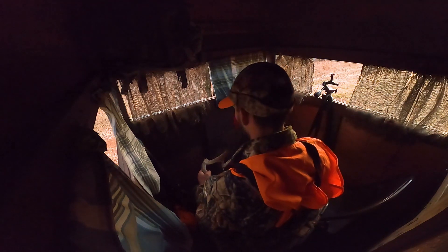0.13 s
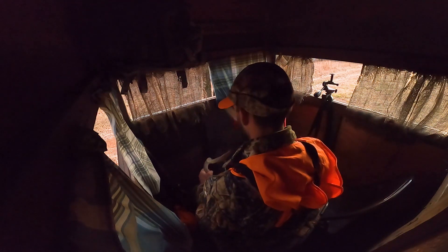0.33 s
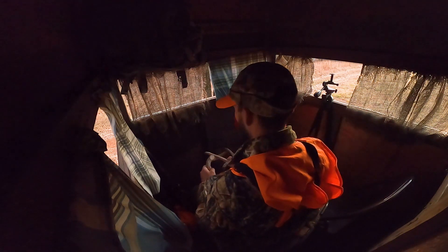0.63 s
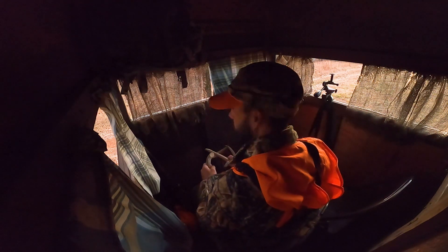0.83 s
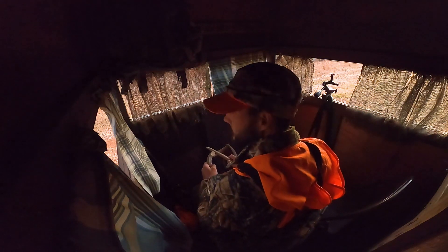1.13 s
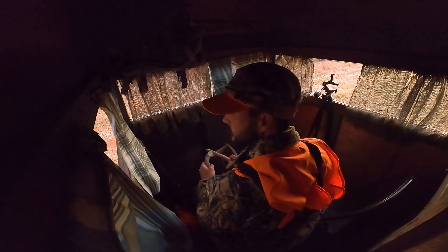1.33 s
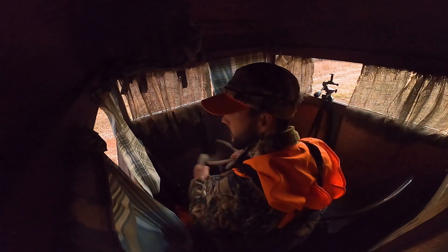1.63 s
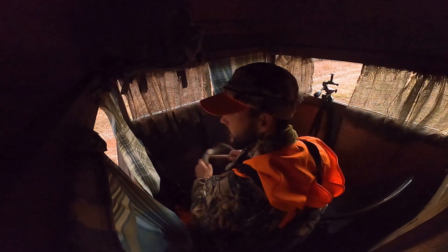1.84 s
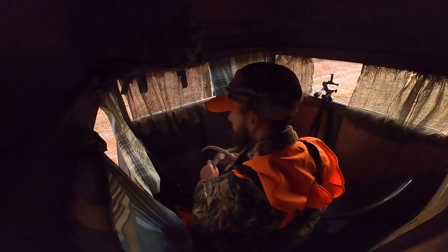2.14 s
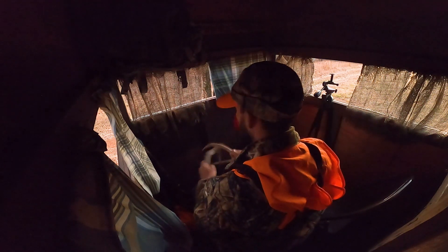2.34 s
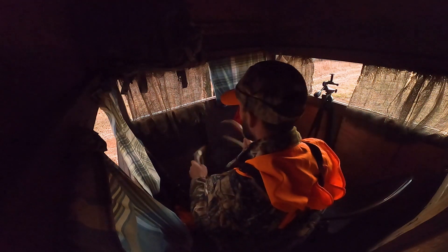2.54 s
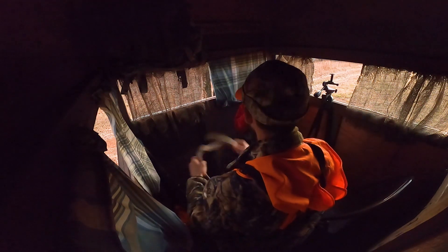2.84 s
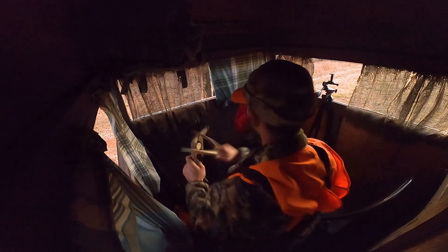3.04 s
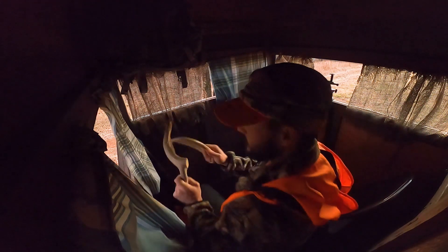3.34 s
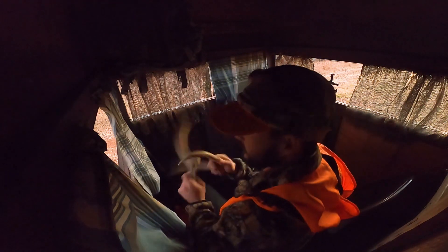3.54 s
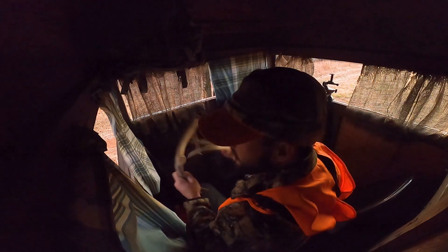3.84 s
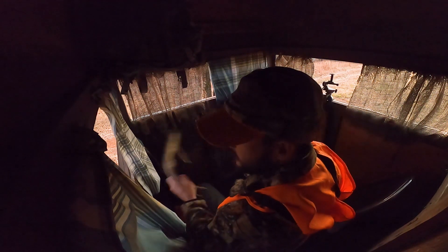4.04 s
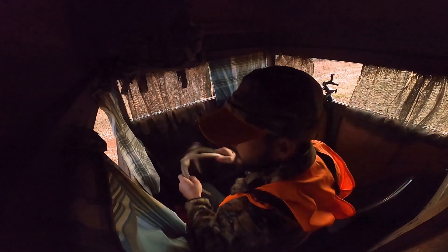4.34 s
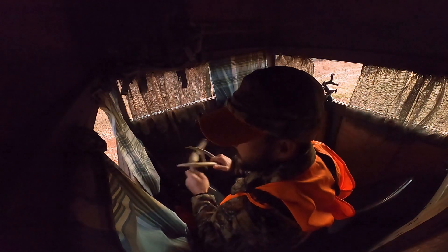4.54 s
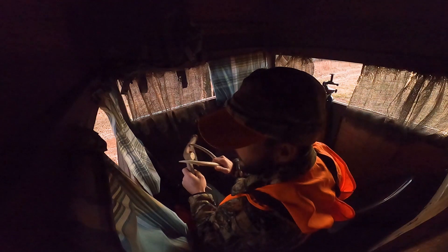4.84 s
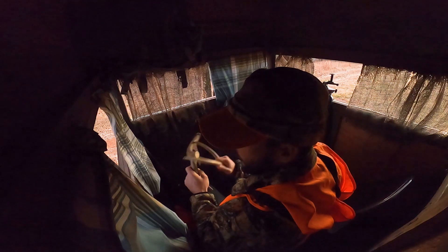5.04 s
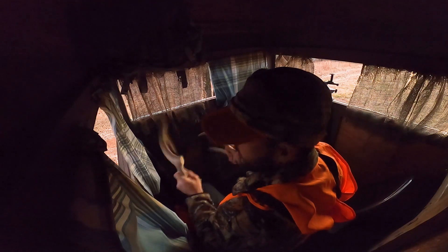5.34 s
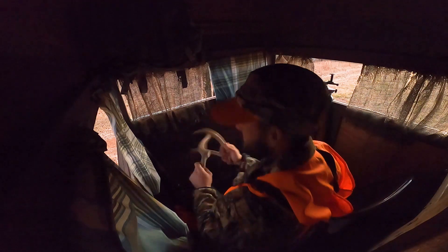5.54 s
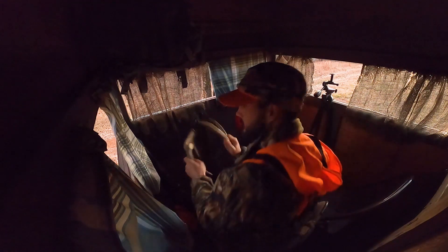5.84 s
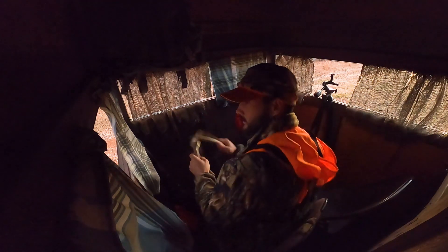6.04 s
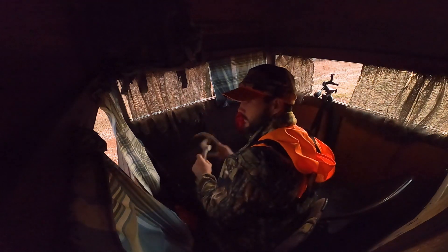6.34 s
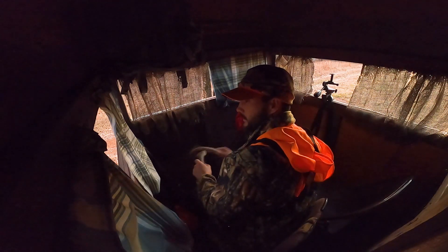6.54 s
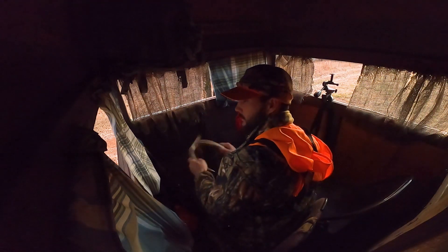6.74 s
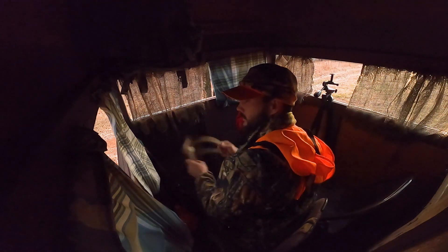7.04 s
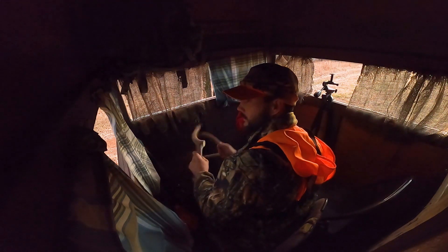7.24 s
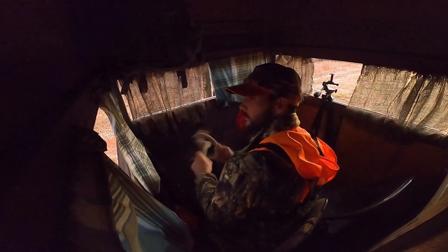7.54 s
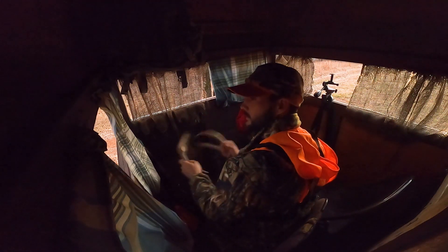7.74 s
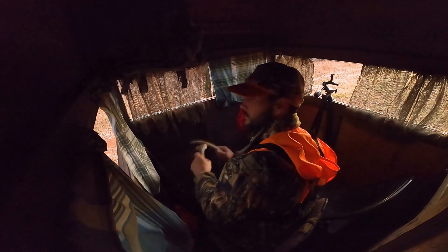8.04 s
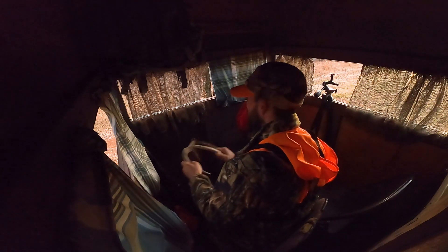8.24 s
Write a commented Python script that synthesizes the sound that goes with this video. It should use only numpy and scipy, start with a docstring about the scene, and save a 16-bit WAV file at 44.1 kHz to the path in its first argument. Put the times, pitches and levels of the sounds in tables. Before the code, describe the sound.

Two deer antlers clack and scrape together in irregular bursts, close by, over a low outdoor rumble.

```python
"""A low outdoor rumble and a wavering hum come first and fill every pause. Then two deer
antlers are knocked and ground together by hand inside a small cloth hunting blind.
Their tips (tines) clack and chatter, their rough shafts (beams) scrape, and both set the
same short bone notes ringing. Two dull bumps come near the end.
Two close microphone openings listen from behind."""
import sys
import numpy as np
from scipy import signal
from scipy.fft import rfft, irfft
from scipy.io import wavfile
from scipy.ndimage import uniform_filter1d, map_coordinates

SR = 44100
rng = np.random.default_rng(int(sys.argv[2]) if len(sys.argv) > 2 else 0)


def transcribe(u):
    """Save the signal u as a 16-bit wav file named by the first command-line argument.

    u: samples, shape (n,) or (channels, n), limited to [-1, 1]; the rate is SR.
    q: integer samples, one column per channel.
    """
    v = np.clip(np.atleast_2d(u).T, -1, 1)
    q = np.round(v * 32767).astype(np.int16)
    wavfile.write(sys.argv[1], SR, q)


N = 370440

# The tone of the outdoor rumble: pitch_hz, relative_db
RUMBLE_TONE = [(18, -14), (35, -2), (75, -6), (120, -16), (160, -14.5), (290, -23.5), (480, -33.5),
               (640, -47), (1400, -52), (2800, -56.5), (5600, -59), (10000, -77)]
# How alike the rumble is on the left and right (1 is the same): pitch_hz, likeness
RUMBLE_LIKENESS = [(60, 0.92), (380, 0.82), (2380, 0.94), (15000, 0.08)]
# The wavering low hum: pitch_hz, width_hz, level_db
LOW_HUM = (53, 9.1, -41)
# Knocks of tine on tine: start_s, level_db, ring_hz, treble_db
TINE_KNOCKS = [(0.569, -12.5, 5680, -7.5), (0.638, -35.5, 1240, -11.5), (0.6486, -27, 3110, -19),
               (1.7735, -27, 4390, 0.5), (1.8363, -14.5, 2700, -13.5), (1.9122, -14.5, 2975, -9.5),
               (1.9204, -27, 3120, -10), (1.9995, -29.5, 4080, -7), (2.1803, -21, 2840, -1),
               (2.2274, -14, 2170, -11), (2.413, -32.5, 3550, -6), (2.454, -26, 3850, -5.5),
               (2.5739, -27.5, 2080, -13), (2.589, -29, 4930, -1.5), (2.7957, -14, 3060, -3.5),
               (2.958, -24.5, 1572, -11.5), (3.1583, -19, 3100, -0.5), (3.1681, -15, 2810, -5),
               (3.3892, -22.5, 3140, -6.5), (3.409, -29.5, 3180, 6), (3.7152, -18.5, 2810, 0.5),
               (3.7801, -18, 2870, -11), (3.959, -36.5, 3350, -6.5), (3.9825, -32.5, 2850, -4),
               (4.2288, -17.5, 5550, 1), (4.368, -25, 2310, -28.5), (4.3828, -26, 1485, -13),
               (4.5142, -31, 4760, -4), (5.3434, -29, 2780, -1.5), (5.346, -26.5, 1590, 2),
               (5.5742, -30.5, 3560, 1.5), (5.6178, -19.5, 2680, -2.5), (5.685, -20.5, 1510, 1.5),
               (5.7018, -19.5, 4730, -10.5), (5.7152, -26.5, 2700, -6.5), (5.7235, -37.5, 2530, 0),
               (5.7676, -32.5, 3580, -4.5), (5.7895, -20, 4950, -1.5), (5.8816, -32, 2710, -5),
               (5.896, -42.5, 5200, 9), (6.0792, -15.5, 3114, -0.6), (6.1816, -26.5, 3360, -19.5),
               (6.1921, -26, 2730, -5), (6.34, -29, 3410, 4.5), (6.3601, -29, 5680, 4.5),
               (6.372, -18.5, 3310, -11), (6.46, -15, 2730, -18), (6.675, -26, 2570, -5),
               (6.6847, -17, 2630, -19), (6.7035, -16, 3570, -9.5), (6.7258, -18, 2110, -8.5),
               (6.8631, -16.5, 2730, -4.5), (6.8742, -32, 2500, 7), (6.9325, -18.5, 2880, -2.5),
               (6.9428, -15.5, 2700, -5), (7.1488, -40, 2594, -3.5), (7.216, -29.5, 2377, 1),
               (7.2742, -17, 2876, -2), (7.326, -18.5, 2530, -3), (7.3364, -20, 2476, -15),
               (7.664, -22.5, 5600, 1), (7.6791, -19, 3340, -9.5), (7.751, -31, 2145, -8.5),
               (7.834, -17, 2608, -13.5), (7.856, -27, 5960, 1.5), (8.086, -18, 2790, 2),
               (8.116, -17, 3620, -8), (8.274, -17, 3950, -11)]
# The notes an antler rings at: pitch_hz, relative_db
BONE_NOTES = [(530, -13), (738, -17.5), (1238, -10), (1480, -5.5), (1728, -12), (1870, -9), (2060, -8),
              (2299, -7), (2460, -6), (2751, -3.5), (3050, -13), (3289, -8), (3500, -3.5), (4050, -7),
              (4550, -12.5), (4980, -15.5)]
# The tone of countless small contacts: pitch_hz, relative_db
CHATTER_TONE = [(120, -57), (200, -30), (310, -23), (420, -16), (745, -15), (1000, -9), (1490, 1),
                (2730, 2.5), (4310, -1.5), (5170, -8), (9280, -27), (15800, -71)]
# Strokes of beam along beam: hardest_press_s, rise_s, fall_s, level_db, treble_db, ring_hz
SCRAPE_STROKES = [(0.63, 0.042, 0.057, -29, -10.5, 2500), (0.788, 0.11, 0.09, -49, 1, 2675),
                  (1.591, 0.14, 0.083, -43.5, 5, 2650), (1.65, .08, 0.056, -50, 12.5, 2200),
                  (1.72, 0.014, 0.034, -59.5, 20, 4400), (1.968, 0.074, 0.07, -22.5, 4.5, 2130),
                  (2.34, 0.12, 0.09, -26.5, -6.5, 2200), (2.418, 0.023, 0.16, -33, 1.5, 3280),
                  (2.598, 0.092, 0.016, -24.5, 4.5, 4560), (2.978, 0.19, 0.048, -27.5, -3.5, 1530),
                  (3.292, 0.14, 0.044, -39, 3.5, 1700), (3.345, .028, 0.046, -32, 9, 2580),
                  (3.412, 0.016, 0.068, -23, -11.5, 3070), (3.875, .09, 0.061, -43, 2, 1520),
                  (3.992, 0.045, 0.056, -26, 5, 2770), (4.27, 0.049, 0.037, -25, -1.5, 2100),
                  (4.329, 0.096, 0.23, -38.5, -10, 1370), (4.41, 0.033, 0.06, -27, -5.5, 1510),
                  (4.479, 0.1, 0.071, -23.5, 0.5, 2750), (4.572, 0.094, 0.067, -35.5, 3, 2750),
                  (4.714, 0.088, 0.053, -37, 4.5, 1760), (4.841, 0.097, 0.036, -47, 9, 2060),
                  (4.945, 0.089, 0.07, -49, 7.5, 2990), (5.199, 0.06, 0.039, -49.5, 9.5, 2010),
                  (5.344, 0.029, 0.031, -30, 12.5, 3000), (5.478, 0.019, 0.045, -54, 6, 1175),
                  (5.733, 0.015, .05, -36, -16.5, 2510), (5.779, 0.058, 0.024, -30, 4.5, 3460),
                  (5.899, 0.041, 0.034, -27, 5, 2710), (6.208, 0.063, 0.037, -22, 10, 2820),
                  (6.713, 0.039, 0.1, -21.5, 0.5, 2440), (6.791, 0.023, 0.065, -37, -18, 2760),
                  (7.068, 0.1, 0.16, -31, -10.5, 1230), (7.148, 0.13, 0.023, -29.5, 6, 2700),
                  (7.424, 0.035, 0.028, -31, 10.5, 2650), (7.691, 0.015, 0.061, -22, -16, 3510),
                  (8.117, 0.035, 0.04, -19.5, 9.5, 3300), (8.209, 0.036, 0.065, -42, -6, 1802),
                  (8.299, 0.012, 0.082, -36, -2, 4046), (8.39, 0.17, 0.053, -38, 1.5, 2680)]
# How much louder the left microphone opening is: pitch_hz, left_minus_right_db
LEFT_LOUDER = [(60, -0.5), (130, -2), (290, -1), (640, 4), (1410, 0), (3100, 4.5), (6820, 0), (15000, -0.5)]
# How far the wave at the left opening runs ahead: pitch_hz, lead_radians
LEFT_AHEAD = [(200, 0.03), (690, -1.34), (1380, 0.97), (2200, -0.07), (3700, -1.5), (5200, -.3),
              (7000, -1.2), (13000, -1.5)]
# Blows that bend the whole beam: start_s, level_db
BEAM_BLOWS = [(2.803, -37), (3.168, -37), (3.358, -30.5), (3.393, -32.5), (4.232, -34), (4.378, -36),
              (5.35, -25), (5.626, -39.5), (5.914, -32.5), (6.082, -38.5), (6.224, -37), (6.461, -34),
              (6.75, -26), (6.875, -32), (6.943, -31.5), (7.848, -33), (8.086, -22), (8.113, -23.5)]
# Dull bumps: start_s, level_db, pitch_hz, fade_s
DULL_BUMPS = [(7.702, -21, 55.4, 0.41), (8.089, -4, 77.8, 0.0099)]

BONE_FADE_S = .085  # hands damp every note alike; a fade time is how long a 60 dB drop takes
SNAP_DB, SNAP_PER_TREBLE, SOFTEST_DB = 1.5, 0.66, -23  # harder contacts snap louder
STROKE_DEPTH_DB, STROKE_CURVE = 30, 1.276  # drop over a rise or fall time; roundness of the swell
TICKS_PER_S = 450  # how often ridges catch in a scrape
FOCUS_DB = 8  # boost for bone notes near the tine's own note
GLIDE, DETUNE = .035, .03  # share by which rubbed notes slide and shift with the grip
SWAY_SAMPLES, SWAY_DB = .6, .7  # moving hands shift arrival time and left-right balance
BEAM_HZ, BEAM_FADE_S, BEAM_RISE_S = 316.6, 0.22, .01
SPLIT_HZ, TOP_HZ = 5000, 15900  # where the treble begins and ends


def gain_of(db):
    """Turns decibels into a number to multiply by."""
    return 10 ** (np.asarray(db) / 20)


def evened(x):
    """Scales a signal to an average strength (rms) of 1."""
    return x / np.sqrt(np.mean(x ** 2) + 1e-20)


def look_up(table, hz):
    """Reads a table between its rows, on a musical pitch scale."""
    pitches, values = np.transpose(table)
    return np.interp(np.log(hz + 1), np.log(pitches + 1), values)


def add(mix, start_s, sound):
    """Mixes a sound in at a given time."""
    part = mix[round(start_s * SR):][:len(sound)]
    part += sound[:len(part)]


def outdoor_rumble():
    """Deep noise in which patches of pitch slowly swell and sink."""
    frames, hz = N // 512 + 5, np.fft.rfftfreq(2048, 1 / SR)
    a, b, c, d, patches = rng.standard_normal((frames, 1025, 5)).T
    patches = evened(uniform_filter1d(uniform_filter1d(patches, 6, 0), 20, 1))
    likeness = look_up(RUMBLE_LIKENESS, hz)[:, None]
    left = a + 1j * b
    right = likeness * left + np.sqrt(1 - likeness ** 2) * (c + 1j * d)
    spectra = np.array([left, right]) * gain_of(look_up(RUMBLE_TONE, hz)[:, None] + 1.5 * patches)
    return gain_of(-43) * evened(signal.istft(spectra, nperseg=2048, noverlap=1536)[1][:, :N])


def low_hum():
    """Noise in one narrow low band, heard as a wavering note."""
    hz, width_hz, db = LOW_HUM
    smooth = signal.butter(2, width_hz / 2, fs=SR, output="sos")
    a, b = signal.sosfilt(smooth, rng.standard_normal((2, N)))
    waver = (a + 1j * b) / ((a ** 2 + b ** 2) ** 0.089 + 1e-12)  # dividing softens the swells
    return gain_of(db) * evened((waver * np.exp(2j * np.pi * hz * np.arange(N) / SR)).real)


def tilt_db(hz, treble_db):
    """Hard tip contacts favour high notes, broad soft ones favour low notes."""
    return 0.18 * (treble_db - 4.0) * np.log2(np.clip(hz, 900, 14000) / 2500)


def focus_db(hz, ring_hz, octaves):
    """Bone notes near the touched tine's own note speak louder."""
    return FOCUS_DB * np.exp(-(np.log2(hz / ring_hz) / octaves) ** 2)


def chatter_bands(noise, treble_db, lumps_db):
    """Shapes noise into bone chatter; returns its body and its treble, equally strong."""
    hz = np.fft.rfftfreq(len(noise), 1 / SR)
    lump_places = np.linspace(np.log(300), np.log(16000), 30)
    lumps = np.interp(np.log(hz + 1), lump_places, rng.standard_normal(30))
    lumps *= lumps_db * np.clip(hz / 1500, .3, 1)
    spectrum = rfft(noise) * gain_of(look_up(CHATTER_TONE, hz) + lumps + tilt_db(hz, treble_db))
    high = 1 / (1 + (SPLIT_HZ / (hz + 1)) ** 8)
    return [evened(irfft(spectrum * band, len(noise))) for band in (1 - high, high)]


def struck_bone(t, ring_hz, treble_db):
    """A knock starts all the bone notes; each grip and spot weighs and tunes them anew."""
    hz, db = np.transpose(BONE_NOTES)[:, :, None]
    louder, sharper, phase = np.clip(rng.standard_normal((3, len(hz), 1)), -1.5, 1.5)
    strengths = gain_of(db + 4.9 * louder + focus_db(hz, ring_hz, octaves=0.4) + tilt_db(hz, treble_db))
    swell = 1 - np.exp(-t * hz / 2.0)  # low notes take longer to build
    notes = np.sin(2 * np.pi * hz * (1 + 0.022 * sharper) * t + 2 * phase)
    return (strengths * swell * notes).sum(0) / np.sqrt((strengths ** 2).sum())


def contact_snap(t, ring_hz, treble_db):
    """The first touch of two tines: a crack about a millisecond long."""
    hz = [ring_hz, *[4400, 7400] * rng.uniform(.75, 1.25, 2)]
    tones = gain_of(3.58 * tilt_db(hz, treble_db - 2.5)) @ np.sin(2 * np.pi * np.outer(hz, t))
    age = t / .0005
    pulse = 2 * age * np.exp(1 - age)
    return gain_of(SNAP_DB + SNAP_PER_TREBLE * max(treble_db, SOFTEST_DB)) * pulse * tones


def tine_clacks():
    """Each knock gives a snap, a dying chatter, the bone notes and the struck tine's own note."""
    out, t = np.zeros(N), np.arange(SR // 5) / SR
    for start_s, level_db, ring_hz, treble_db in TINE_KNOCKS:
        body, treble = chatter_bands(rng.standard_normal(len(t)), treble_db, lumps_db=2.0)
        bone = struck_bone(t, ring_hz, treble_db)
        snap = contact_snap(t, ring_hz, treble_db)
        rebounds = signal.fftconvolve(rng.standard_normal(len(t)), np.hanning(90), "same")
        rattle = gain_of(3.94 * evened(rebounds))  # tines bounce back unevenly
        body *= np.minimum(t / 0.013, 1) * gain_of(-60 * t / 0.1)
        treble *= 0.63 * gain_of(-60 * t / 0.08) + 0.97 * gain_of(-60 * t / 0.024)
        chatter = rattle * (body + gain_of(treble_db) * treble)
        tine = np.sqrt(rattle) * np.sin(2 * np.pi * ring_hz * t)
        tine *= gain_of(-t * 0.17 * max(0, ring_hz - 3600))  # high notes die fast
        ring = (1.27 * bone + 0.54 * tine) * gain_of(-60 * t / BONE_FADE_S)
        add(out, start_s, gain_of(level_db) * (snap + 0.91 * chatter + ring))
    return out


def rubbed_bone(t, ticks, ring_hz, treble_db):
    """Ticks shake the bone notes; the contact wanders, so each note comes and goes."""
    ring, marks = np.zeros(len(t)), t[::2000]
    decay = gain_of(-60 / (.6 * BONE_FADE_S * SR))  # pressed together, antlers ring shorter
    for hz, db in BONE_NOTES:
        wander_db = 5.0 * np.interp(t, marks, rng.standard_normal(15)[:len(marks)])
        shift, *slide = rng.uniform(-1, 1, 16)
        pitch_hz = hz * (1 + DETUNE * shift + GLIDE * np.interp(t, marks, slide[:len(marks)]))
        wave = np.exp(2j * np.pi * np.cumsum(pitch_hz) / SR)
        tone_db = db + tilt_db(hz, treble_db - 8.5) + focus_db(hz, ring_hz, octaves=0.2)
        kicks = ticks * gain_of(tone_db + wander_db)
        ring += (wave * signal.lfilter([1], [1, -decay], kicks / wave)).imag  # each kick rings on
    return evened(ring)


def beam_scrapes():
    """Ridges of one beam catch on the other: uneven ticks that ring the bone and fizz."""
    out, longest = np.zeros(N), 2 * SR // 3
    fizz_decay = gain_of(-120 / (0.045 * SR))
    for press_s, rise_s, fall_s, level_db, treble_db, ring_hz in SCRAPE_STROKES:
        rise_s, fall_s = np.clip([rise_s, fall_s], .005, .2)
        t = np.arange(-1.5 * rise_s, 1.5 * fall_s, 1 / SR)
        fade_db = STROKE_DEPTH_DB * np.where(t < 0, -t / rise_s, t / fall_s) ** STROKE_CURVE
        chance, direction, rarity = rng.random((3, longest))[:, :len(t)]
        noise = rng.standard_normal(longest)[:len(t)]
        size = gain_of(3.6 * np.minimum(-np.log(rarity + 1e-9), 4))  # big ticks are rare
        ticks = np.sign(direction - .5) * size * (chance < TICKS_PER_S / SR)
        ticks = np.convolve(ticks, np.hanning(5), "same")  # rounded ridges
        ring = rubbed_bone(t, ticks, ring_hz, treble_db)
        energy = uniform_filter1d(ticks ** 2, size=16) + 1e-9
        grains = evened(np.sqrt(signal.lfilter([1], [1, -fizz_decay], energy)))  # each tick fizzes out
        body, treble = chatter_bands(noise, treble_db - 9.5, lumps_db=4.5)
        treble *= gain_of(treble_db + .12 * fade_db)  # a lighter touch sounds brighter
        fizz = grains * (0.51 * body + 0.13 * treble)
        add(out, press_s + t[0], (0.72 * ring + fizz) * gain_of(level_db - fade_db))
    return out


def cloth_blind(x):
    """Adds quick reflections from cloth and body that shift as the hands move."""
    t, out = np.arange(1500) / SR, np.array([x, x])
    for k in range(3):  # three sets of reflections take turns
        walls = rng.standard_normal((2, len(t))) * (rng.random((2, len(t))) < .15)
        walls *= gain_of(-60 * t / 0.089)
        walls = signal.lfilter([1, -.7], [1], walls)  # thin walls return mostly treble
        walls /= np.linalg.norm(walls, axis=1, keepdims=True)
        share = np.sqrt(2 / 3) * np.cos(2 * np.pi * (np.arange(N) / SR * 11 + k / 3))
        out += signal.oaconvolve((x * share)[None], walls, axes=1)[:, :N]
    return out


def microphone_openings(stereo):
    """Each opening hears its own level and timing, which sway as the hands move."""
    lag, pan = (evened(uniform_filter1d(uniform_filter1d(noise, 3000), 3000))
                for noise in rng.standard_normal((2, N)))
    swayed = []
    for channel, side in zip(stereo, (1, -1)):
        shifted = map_coordinates(channel, [np.arange(N) + side * SWAY_SAMPLES * lag / 2], order=3)
        swayed.append(shifted * gain_of(side * SWAY_DB * pan / 2))
    hz = np.fft.rfftfreq(N, 1 / SR)
    left = gain_of(look_up(LEFT_LOUDER, hz) / 2) * np.exp(.5j * look_up(LEFT_AHEAD, hz))
    return irfft(rfft(np.array(swayed)) * np.array([left, 1 / left]), N)


def tree_echo(x):
    """A faint dull tail from the trees beyond the cloth; leaves scatter and blur the notes."""
    t = np.arange(SR // 2) / SR
    tail = signal.lfilter([1], [1, -1.0, .3], rng.standard_normal((2, len(t)))) * gain_of(-60 * t / .7)
    tail *= gain_of(-37.5) / np.linalg.norm(tail[0])
    scatter = evened(signal.fftconvolve(rng.standard_normal(N), np.hanning(60), "same"))
    return signal.oaconvolve((x * scatter)[None], tail, axes=1)[:, :N]


def beam_bending():
    """The whole beam bends: a low note swells and rings on, unevenly in the moving hand."""
    out, t = np.zeros(N), np.arange(SR // 4) / SR
    note = (1 - np.exp(-t / BEAM_RISE_S)) * np.sin(2 * np.pi * BEAM_HZ * t)
    for start_s, level_db in BEAM_BLOWS:
        grip = gain_of(1.5 * evened(uniform_filter1d(rng.standard_normal(len(t)), 700)))
        add(out, start_s, grip * note * gain_of(level_db - 60 * t / BEAM_FADE_S))
    return out


def frame_bumps():
    """Short low thumps travel through the frame."""
    out, t = np.zeros(N), np.arange(SR // 4) / SR
    for start_s, level_db, hz, fade_s in DULL_BUMPS:
        add(out, start_s, -gain_of(level_db - 60 * t / fade_s) * np.sin(2 * np.pi * hz * t))
    return out


def scene():
    """Antlers in the blind, with their echo and the bumps, over the rumble and hum."""
    antlers = tine_clacks() + beam_bending() + beam_scrapes()
    close = microphone_openings(cloth_blind(antlers))
    return close + tree_echo(antlers) + frame_bumps() + outdoor_rumble() + low_hum()


def record(dry):
    """The microphone housing dulls the treble, too-loud peaks clip, and the very top is cut off."""
    dulled = signal.sosfilt(signal.butter(2, 13000, fs=SR, output="sos"), dry)
    top_cut = signal.firwin(511, TOP_HZ, window=("kaiser", 9), fs=SR)
    return signal.oaconvolve(np.clip(dulled, -1, 1), top_cut[None], "same")


dry = scene()
out = record(dry)
transcribe(out)
```